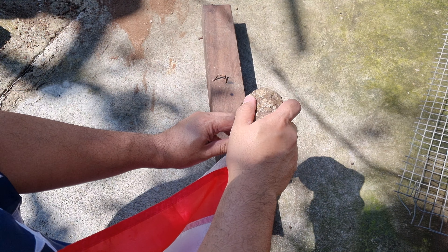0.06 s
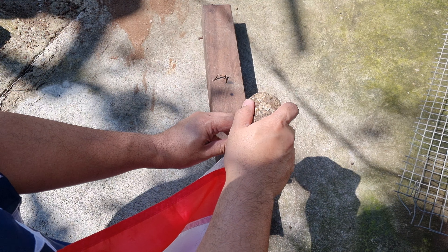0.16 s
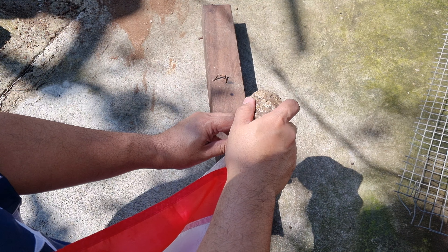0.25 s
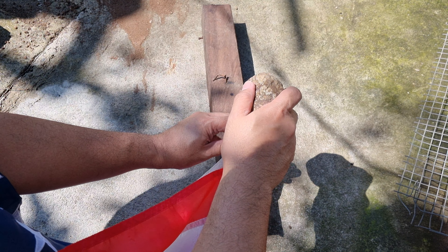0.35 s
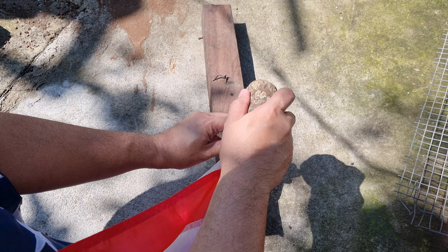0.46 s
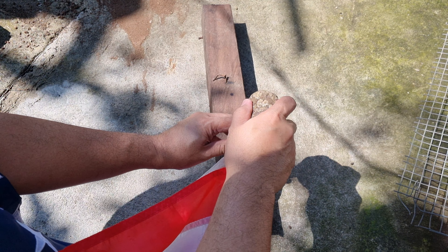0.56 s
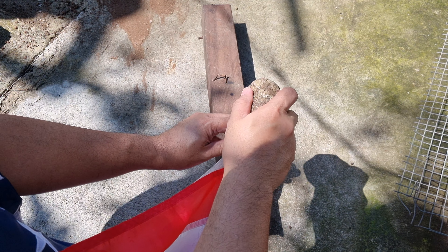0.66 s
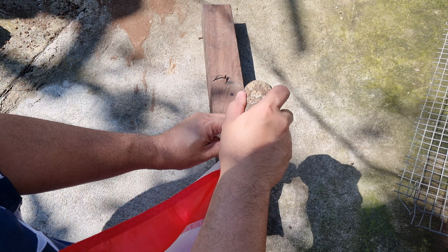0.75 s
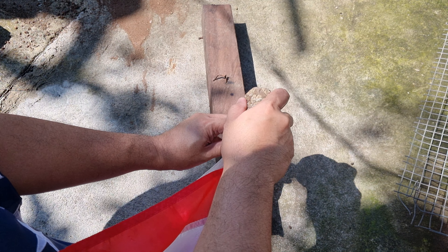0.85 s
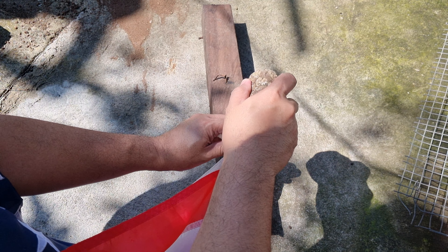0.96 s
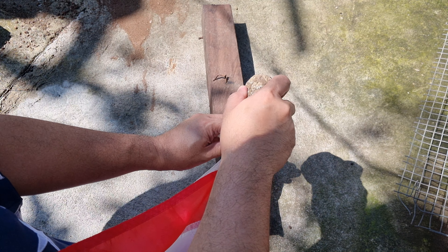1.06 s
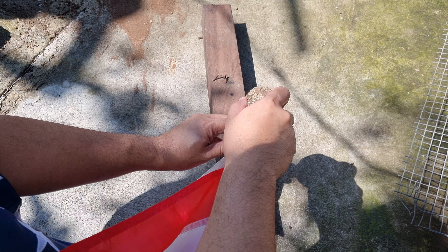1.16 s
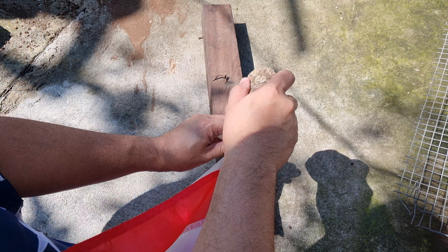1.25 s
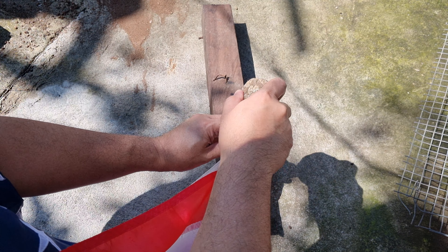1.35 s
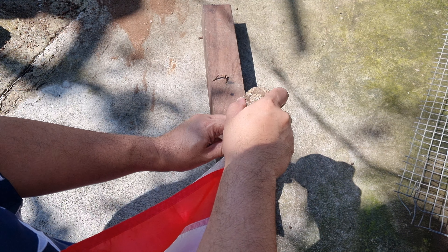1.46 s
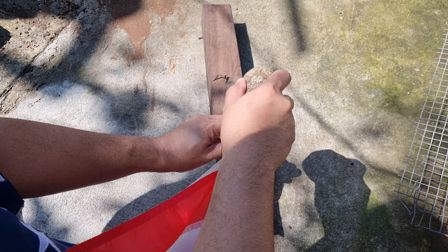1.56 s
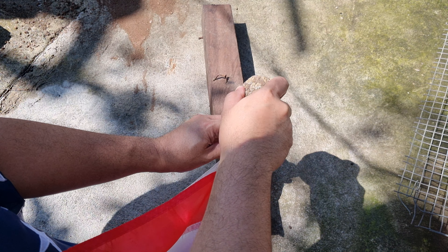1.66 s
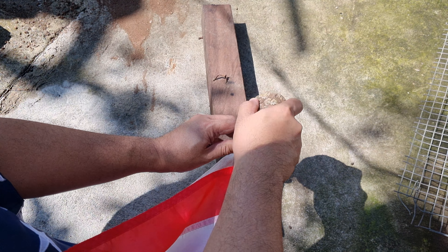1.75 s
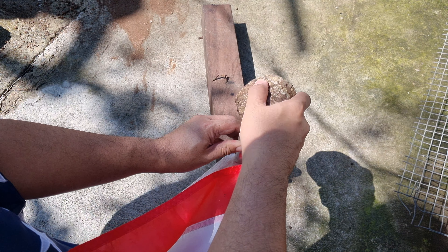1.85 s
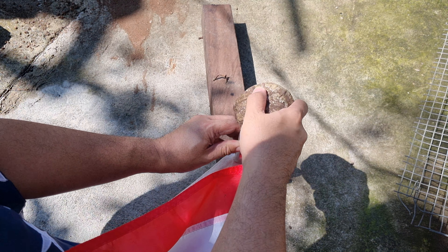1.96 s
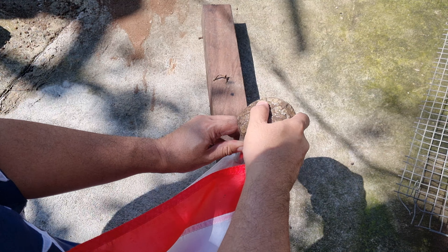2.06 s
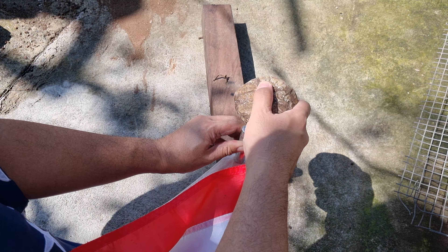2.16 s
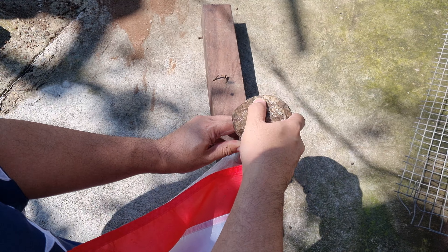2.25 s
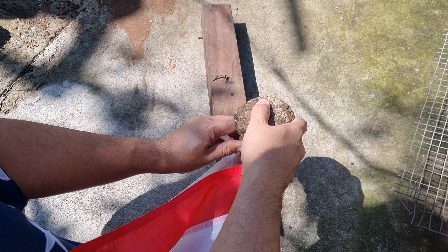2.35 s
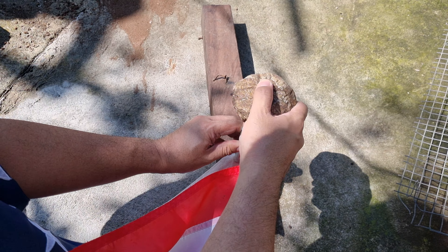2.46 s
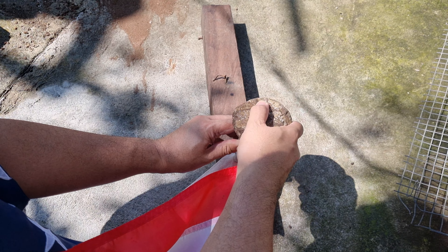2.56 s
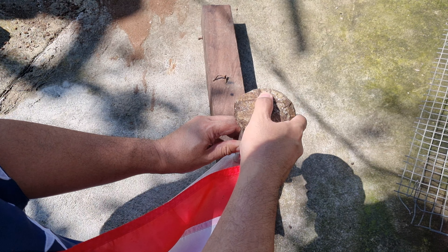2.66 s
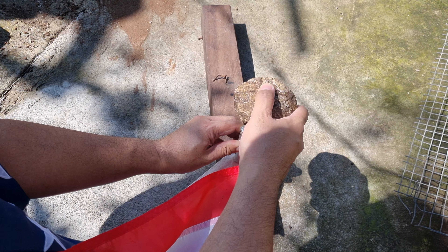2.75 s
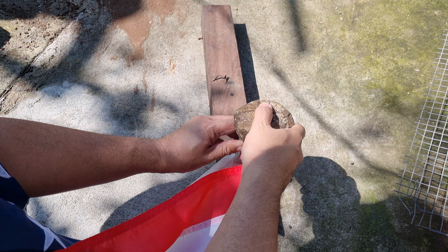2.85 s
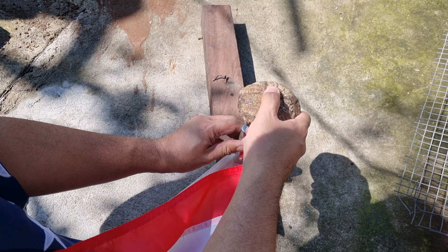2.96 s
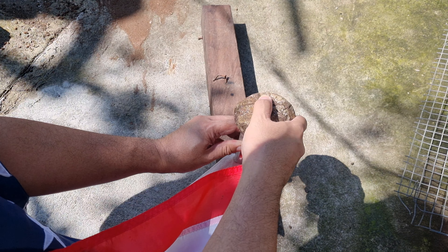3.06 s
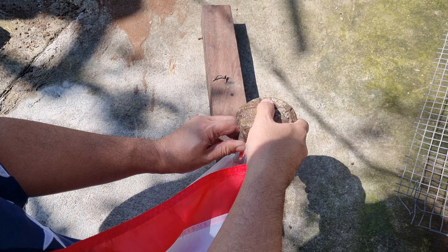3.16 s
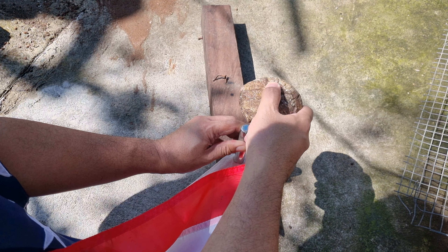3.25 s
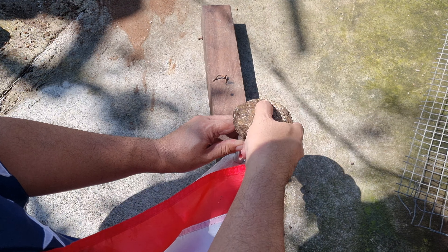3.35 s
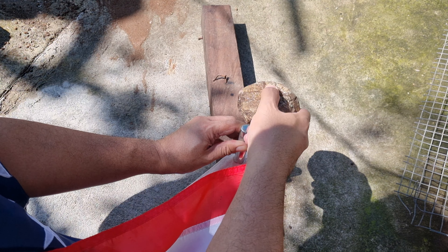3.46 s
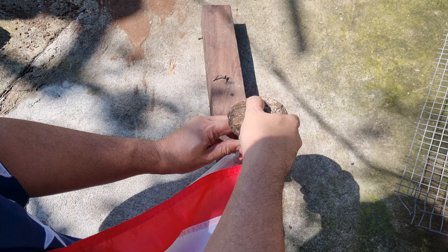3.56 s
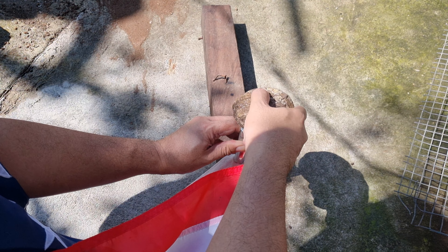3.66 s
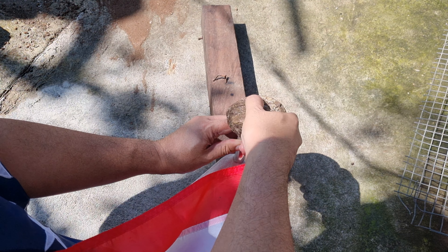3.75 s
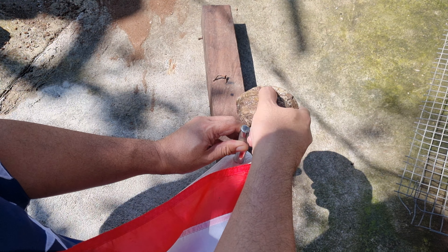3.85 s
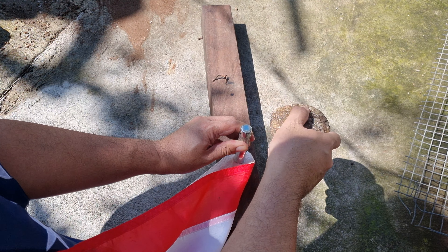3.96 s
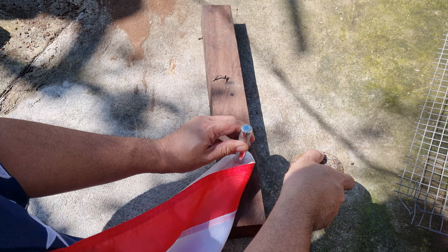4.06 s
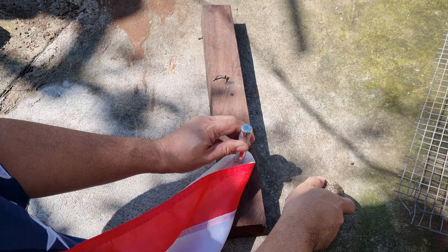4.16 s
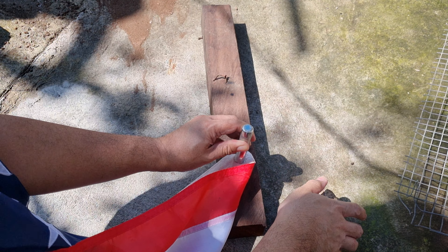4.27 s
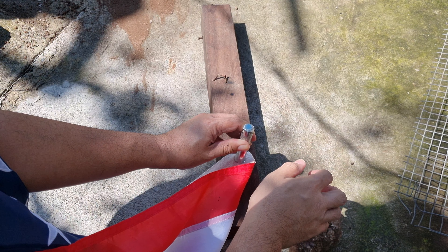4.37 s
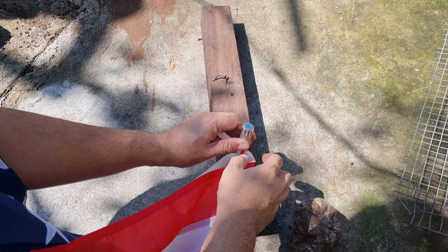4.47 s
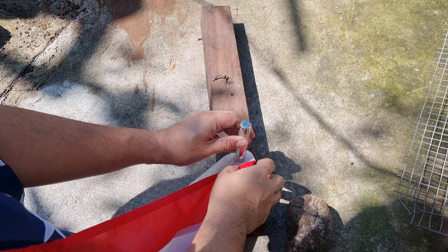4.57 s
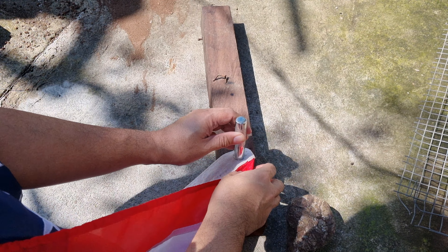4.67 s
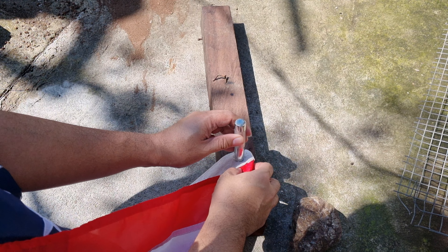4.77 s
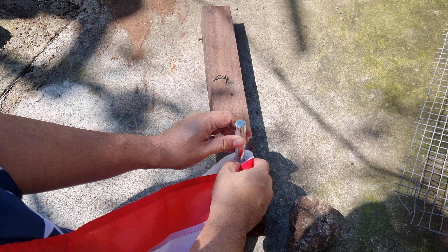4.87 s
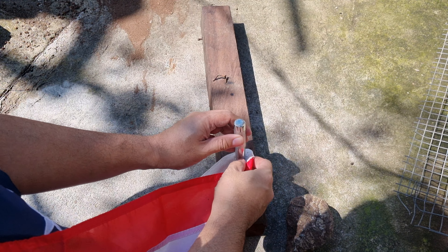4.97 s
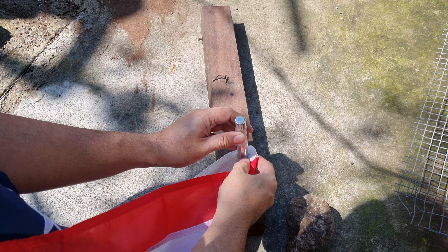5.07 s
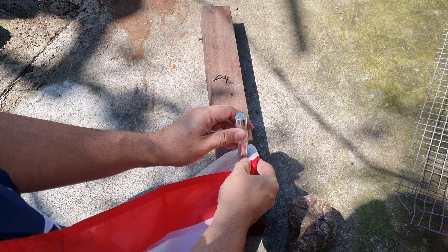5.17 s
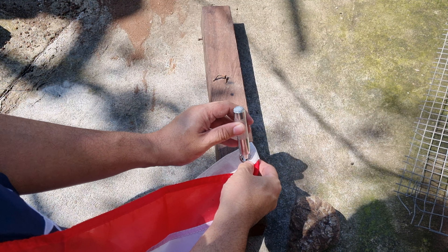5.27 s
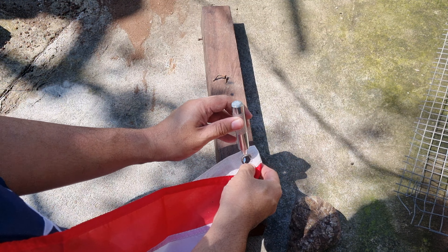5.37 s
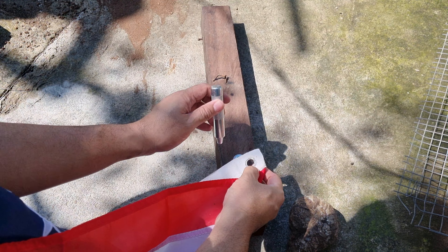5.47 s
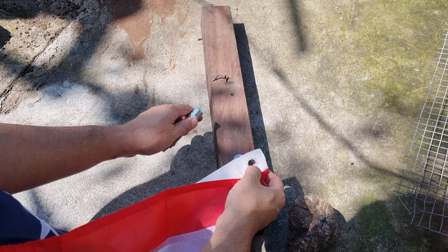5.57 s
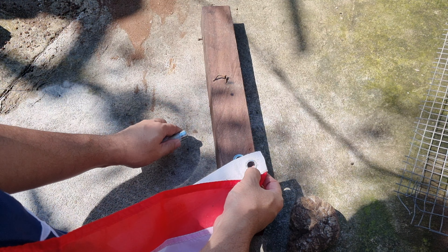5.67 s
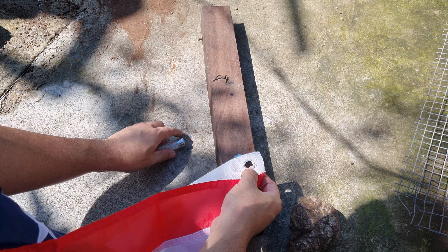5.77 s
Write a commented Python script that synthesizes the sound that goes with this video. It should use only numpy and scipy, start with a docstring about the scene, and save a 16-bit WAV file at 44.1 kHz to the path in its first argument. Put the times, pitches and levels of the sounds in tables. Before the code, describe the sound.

Rapid, sharp clinks of stone on a metal punch outdoors, followed by a dull knock, faint ticks and a thin ting.

```python
"""Outdoors on a concrete slab, a stone drives a hand-held steel punch into a grommet on a wooden board.
Each blow crushes grit with a crack, rings the punch and knocks the board; nearby walls answer briefly.
Then the stone is put down, the punch is wiggled free, the cloth shifts and the punch is laid aside.
Behind it all are a far rumble, soft air, the hum of a distant machine and a faint whine."""
import sys
import numpy as np
from scipy import signal
from scipy.fft import rfft, irfft, next_fast_len
from scipy.io import wavfile
from scipy.ndimage import uniform_filter1d

SR = 44100
rng = np.random.default_rng(int(sys.argv[2]) if len(sys.argv) > 2 else 0)


def unload_audio(sound):
    """Save the sound as a 16-bit wav file, at the path given as the first command line argument."""
    columns = np.transpose(np.atleast_2d(sound))
    # keep every value between -1 and 1, then stretch to whole-number steps
    steps = np.round(np.clip(columns, -1, 1) * 32767)
    wavfile.write(sys.argv[1], SR, steps.astype(np.int16))


N = 256566
T = np.arange(N) / SR
AGE = T[:SR // 4]   # seconds since a hit


def from_db(db):
    """Turn decibels into a number to multiply by."""
    return 10 ** (np.asarray(db) / 20)


def at_hz(points, hz, column=1):
    """Read between the rows of a table, with octaves evenly spaced."""
    table = np.array(points)
    return np.interp(np.log(np.maximum(hz, 1)), np.log(table[:, 0]), table[:, column])


def add(out, s, sound):
    """Mix a sound in, starting at s seconds."""
    start = max(round(s * SR), 0)
    out[:, start:start + sound.shape[-1]] += sound[..., :N - start]


def fade(fade_s):
    """Dying away after a hit: the fade time is how long it takes to drop 60 dB."""
    return from_db(-60 * AGE / max(fade_s, 1e-3))


def swell(rise_s):
    """Building up while one thing pushes on another."""
    return 1 - np.exp(-AGE / max(rise_s, 1e-5))


def struck(tones):
    """A struck object's fading tones, every other one flipped, a little different in each ear."""
    out, ears = 0, np.array([[.5], [-.5]])
    for k, (hz, db, fade_s, pan_db, phase) in enumerate(tones):
        wave = np.sin(2 * np.pi * hz * AGE + ears * phase)
        out += (-1) ** k * from_db(db + ears * pan_db) * wave * fade(fade_s)
    return out


# How alike the two ears hear a noise (frequency [Hz], likeness [-1 to 1])
EAR_LIKENESS = [(60, 0.89), (350, 0.77), (700, -0.0058), (1400, 0.26), (3000, 0.29), (5000, 0.19),
                (12000, 0.67)]
def noise(colour, size, likeness=EAR_LIKENESS):
    """Stereo noise of strength 1; its colour says how strong the lows and highs are."""
    length = next_fast_len(size)
    mid, side = rfft(rng.standard_normal((2, length)))
    hz = np.arange(len(mid)) * SR / length
    alike = np.clip(at_hz(likeness, hz), -1, 1)
    stereo = np.sqrt(1 + alike) * mid + np.sqrt(1 - alike) * side * [[1], [-1]]
    x = irfft(from_db(at_hz(colour, hz)) * stereo, length)
    return x[:, :size] / np.std(x)


def burst(colour, fade_s, rise_s):
    """A spray of tiny hits that blur into one short noise."""
    shape = fade(fade_s) * swell(rise_s) ** 2
    x = noise(colour, len(AGE)) * shape
    return x * np.sqrt(np.mean(shape ** 2) / np.mean(x ** 2))


# How the background rises and falls (time [s], relative rumble level [dB], air level [dB])
BACKGROUND_LEVELS = [(0.0, -38, -65), (1.8, -44, -74.5), (3.77, -49, -72), (3.87, -48, -80.5),
                     (5.54, -44, -73), (5.82, -37.5, -64.5)]
# Colours of the rumble and the air (frequency [Hz], relative level [dB])
RUMBLE_COLOUR = [(20, -59), (32, -22.5), (45, -5), (62, -4), (80, -14.5), (110, -10), (150, -1.5),
                 (200, -10.5), (260, -12), (330, -18.5), (450, -26), (600, -28.5), (900, -40), (2000, -86)]
AIR_COLOUR = [(300, -18.5), (500, -0.5), (800, 0), (1500, -0.5), (2300, -4.5), (3100, -4), (3700, -15.5),
              (4800, -22), (7000, -30.5), (16000, -31.5)]
def rumble_and_air():
    """A far, deep rumble under a soft hiss of air."""
    s, rumble_db, air_db = np.transpose(BACKGROUND_LEVELS)
    rumble = from_db(np.interp(T, s, rumble_db) - 2) * noise(RUMBLE_COLOUR, N)
    air = from_db(np.interp(T, s, air_db)) * noise(AIR_COLOUR, N)
    return rumble + air


# The tones of the hum (pitch [Hz], level [dB])
HUM_TONES = [(57, -49.5), (112, -50.5), (556, -75)]
def machine_hum(waver_rad=0.27):
    """A distant machine hums, each tone drifting a little."""
    out = np.zeros(N)
    times = np.linspace(0, T[-1], 40)
    for hz, db in HUM_TONES:
        drift = np.interp(T, times, np.cumsum(rng.normal(0, waver_rad, len(times))))
        out += from_db(db) * np.sqrt(2) * np.sin(2 * np.pi * hz * T + drift)
    return out


# The tones of the whine (pitch [times the main pitch], relative level [dB])
WHINE_TONES = [(.71, -6), (1, 0), (2, -10)]
def whine(start_hz=1690, sink_hz_per_s=190, start_db=-70, fade_db_per_s=13):
    """A faint, unsteady whine that sinks and fades."""
    waver = 1 + 0.16 * uniform_filter1d(rng.standard_normal(N), size=600)
    cycles = np.cumsum((start_hz - sink_hz_per_s * T) * waver) / SR
    tones = sum(from_db(db) * np.sin(2 * np.pi * k * cycles) for k, db in WHINE_TONES)
    return from_db(start_db - fade_db_per_s * T) * tones


# Echoes off the ground and walls (delay [s], relative level [dB])
WALL_ECHOES = [(.0058, -30), (.009, -25), (0.0132, -14), (0.033, -25), (0.049, -36)]
# The tail of blurred echoes (frequency [Hz], relative level [dB], fade time [s])
TAIL_BANDS = [(118.7, -12, 0.28), (288, 1.5, 0.048), (590, -8, 0.12), (1200, -20, 0.15), (1730, -18, 0.17),
              (2300, -15.5, 0.13), (3040, -6, 0.18), (5040, -8.5, 0.15), (9600, -3.5, 0.13),
              (14000, -3, 0.11)]
# How alike the two ears hear that tail (frequency [Hz], likeness [-1 to 1])
TAIL_LIKENESS = [(100, .98), (380, .95), (700, .2), (1500, .6), (2000, .7), (3200, .1), (12000, -.2)]
def yard_echoes(sound, dull_above_hz=2000, tail_delay_s=0.0019):
    """The yard throws a sound back: a few dull echoes and a short tail that dies band by band."""
    echoes = np.zeros((2, len(AGE)))
    for delay, db in WALL_ECHOES:
        echoes[:, round(delay * SR)] = from_db(db)
    echoes = signal.sosfilt(signal.butter(1, dull_above_hz, fs=SR, output="sos"), echoes + 1e-18)
    scatter = rfft(noise([(20, 0), (20000, 0)], len(AGE), TAIL_LIKENESS))
    hz = np.arange(scatter.shape[1]) * SR / len(AGE)
    arrival = np.interp(AGE - tail_delay_s, AGE, swell(rise_s=0.00088))
    edges_hz = np.geomspace(70, 17000, 36)
    for low, high in zip(edges_hz, edges_hz[1:]):
        centre = np.sqrt(low * high)
        band = irfft(scatter * ((hz >= low) & (hz < high)), len(AGE))
        band *= arrival * fade(at_hz(TAIL_BANDS, centre, column=2))
        band /= np.linalg.norm(band, axis=1, keepdims=True)
        share = (high - low) / (SR / 2)   # a wider band carries more energy
        echoes += from_db(at_hz(TAIL_BANDS, centre)) * np.sqrt(share) * band
    return signal.oaconvolve(sound, echoes, axes=1)[:, :N]


# Colour of rubbing and of loose grit (frequency [Hz], relative level [dB])
SCRATCH_COLOUR = [(2000, 9.5), (4000, -1.5), (6500, 3.5), (8000, -1), (9500, -1), (12000, -8.5),
                  (16000, -11.5)]
# Short slides of stone, cloth or steel (time [s], level [dB], half length [s])
SLIDES = [(4.328, -56, 0.0025), (4.35, -77, 0.017), (5.222, -62.5, 0.0098), (5.553, -64, 0.013),
          (5.801, -62, 0.01)]
def rubbing(start_s=4.3, rub_db=-89):
    """Hand and cloth rub as the punch is worked loose, with a few louder slides."""
    level = from_db(rub_db) * (T > start_s)
    level += sum(from_db(db) * np.exp(-((T - s) / length) ** 2) for s, db, length in SLIDES)
    times = T[::150]
    catch_db = 2.9 * np.interp(T, times, rng.standard_normal(len(times)))   # fibres catch and slip
    return level * from_db(catch_db) * noise(SCRATCH_COLOUR, N)


# Stone, hand and tool landing on the slab (time [s], relative level [dB])
SLAB_KNOCKS = [(4.215, -25), (4.243, -46), (4.324, -32), (4.349, -41), (4.561, -48), (4.653, -50.5),
               (4.67, -44), (4.815, -44.5), (4.88, -49.5), (5.798, -33.5), (5.806, -32.5)]
# Colours of a rap on the slab and of its low thud (frequency [Hz], relative level [dB])
RAP_COLOUR = [(30, -37.5), (120, -5), (280, 7), (650, -1.5), (1300, -3), (2200, -16.5), (3300, -29.5),
              (4500, -62.5), (16000, -67.5)]
LOW_THUD_COLOUR = [(60, -9), (150, 4), (300, -3), (650, -7), (1300, -25.5), (3000, -71)]
def slab_knocks():
    """Each thing set down on concrete makes a dull rap, a thud and a trace of grit."""
    out = np.zeros((2, N))
    for s, db in SLAB_KNOCKS:
        add(out, s, from_db(db + 3.5) * burst(RAP_COLOUR, fade_s=0.02, rise_s=0.00026))
        add(out, s, from_db(db - 7) * burst(LOW_THUD_COLOUR, fade_s=0.093, rise_s=0.00088))
        add(out, s, from_db(db - 34) * burst(SCRATCH_COLOUR, fade_s=0.027, rise_s=0.00092))
    return out


# The punch is laid aside (time [s], level [dB], pitch [Hz], fade time [s])
TIP_TOUCHES = [(5.800, -42, 9670, 0.42)]
def tip_ting():
    """The steel tip touches the concrete and gives one thin, high tone."""
    out = np.zeros((2, N))
    for s, db, hz, fade_s in TIP_TOUCHES:
        add(out, s, from_db(db) * np.sin(2 * np.pi * hz * AGE) * fade(fade_s) * swell(rise_s=0.00086))
    return out


# Overtones of punch and stone, the tones above the main ring
# (pitch [Hz], relative level [dB], fade time [s], left over right [dB], left-right phase [rad])
PUNCH_OVERTONES = [(2108, 16.5, 0.0099, 1, 0.35), (2100, -8, 0.04, -6, .2), (2580, -6.5, 0.021, 3.5, 1),
                   (2976, 4, 0.01, 5, 0.21), (3062, -3.5, 0.028, 3, 0.032), (3150, -27, 0.077, -6.5, 0.98),
                   (3147, -21, 0.16, 6.5, .8), (3320, -17.5, 0.032, -1, .6)]
# The punch rocks in the grommet (time [s], relative level [dB])
WIGGLES = [(4.4224, -51.5), (4.649, -50.5), (4.7446, -56), (4.7561, -47.5), (4.988, -33), (5.1171, -51.5),
           (5.1478, -56)]
def punch_ticks(ring_hz=1875):
    """Wiggling the punch makes it tick: such soft touches wake only its lower tones."""
    out = np.zeros((2, N))
    ring = np.sin(2 * np.pi * ring_hz * AGE) * fade(0.051)
    tick = (ring + from_db(-13.5) * struck(PUNCH_OVERTONES)) * swell(rise_s=0.00069) ** 2
    for s, db in WIGGLES:
        add(out, s, from_db(db + 2) * tick)
    return out


# The punch's highest overtones
# (pitch [Hz], relative level [dB], fade time [s], left over right [dB], left-right phase [rad])
CLANK_TONES = [(4274, -1, .065, -3, 0.51), (4423, 5.5, 0.13, -2.5, -0.82), (4570, -3.5, .08, 0.5, 0),
               (4751, -2.5, 0.12, -2, .5), (5630, -5.5, .07, 0, 1)]
def punch_ring(force, treble, skew, give, ring_hz=1866, grip_hz=16, choke_db_per_s=1700):
    """Struck steel rings briefly in the hand; an off-centre blow (skew) mutes it."""
    hz = ring_hz + rng.uniform(-grip_hz, grip_hz)   # the grip shifts the pitch
    ring = from_db(-1 - 13 * skew) * np.sin(2 * np.pi * hz * AGE) * swell(rise_s=.001) * fade(0.04)
    overtones = from_db(-18.5 - 3.5 * skew + 2 * give) * struck(PUNCH_OVERTONES) * swell(rise_s=.0001)
    clank = from_db(-40.5 - 4 * give) * struck(CLANK_TONES) * swell(rise_s=.00017)
    choke = from_db(-choke_db_per_s * skew ** 2 * AGE)
    return (force * (overtones - ring) + treble * clank) * choke


# The tones of the wooden board
# (pitch [Hz], relative level [dB], fade time [s], left over right [dB], left-right phase [rad])
BOARD_TONES = [(245, -12.5, 0.022, -1, -0.15), (300, -13, 0.031, 0, .1), (418, -12, 0.046, 1, .2),
               (566, -7.5, .025, 0.5, .5), (750, -7, 0.029, 1, 2.2), (850, -9.5, 0.0069, 1, 0.39),
               (1238.6, 0, 0.0027, -0.5, -0.65), (1372, 5.5, .007, -0.5, -0.24)]
def board_knock():
    """The board gives a wooden knock and chatters on the slab."""
    knock = from_db(-14.5) * struck(BOARD_TONES) * swell(rise_s=.0001) ** 2
    chatter = from_db(-26) * burst(RAP_COLOUR, fade_s=0.097, rise_s=0.0013)
    return knock + chatter


# The stone's dead clack on the punch, and the low thump under the board
# (pitch [Hz], relative level [dB], fade time [s], left over right [dB], left-right phase [rad])
CLACK_TONES = [(775, -1.5, 0.0082, 1, .3), (1228, 4, 0.0094, 4, 0.11), (2084, 0.5, 0.025, -2, 0.021)]
THUMP_TONES = [(132.8, 9, .12, 1.5, 0.0059), (190, -3.5, 0.17, -1, 0.0031), (265, 6, 0.085, 1, 0),
               (302, 1.5, 0.042, -0.5, 0.0013)]
# Colour of grit being crushed (frequency [Hz], relative level [dB])
CRACK_COLOUR = [(300, -10.5), (700, -11.5), (1500, -4.5), (2700, 4.5), (3700, 1.5), (5500, -4),
                (7800, -20.5), (9900, -11), (12500, -24), (16000, -35.5)]
# The stone's blows (time [s], force [dB], off-centre [0-1], hardness [dB], flying grit [dB])
STONE_BLOWS = [(0.147, -14.5, 0.25, -2, -63), (0.4903, 0.5, 0.07, 3, -34), (0.7904, 0.5, 0.12, 3.5, -35),
               (1.0938, -1.5, 0.03, 3.5, -42), (1.3814, 0, 1, -11, -66), (1.6839, 0.5, 0.36, 0, -46.5),
               (1.9842, 1, 0.16, -1, -44), (2.2609, 0.5, 0.08, -0.5, -45.5), (2.5347, 1, 0.18, 0.5, -44.5),
               (2.7966, 1.27, 0.08, -0.5, -46.5), (3.0702, 0.5, 0.18, 1, -47.5), (3.3165, 0, 0.1, -1, -45),
               (3.556, -0.47, 0.06, 1, -38), (3.7389, -0.15, 0.21, -0.5, -42)]
def hammering(closed_at_s=2.05, thump_delay_s=.007):
    """The stone meets the punch; a moment later the punch lands on the grommet and drives the board.
    As the grommet closes, the punch lands sooner, with less thump and more clank."""
    out = np.zeros((2, N))
    clack = struck(CLACK_TONES) * swell(rise_s=.0002)
    thump = struck(THUMP_TONES) * swell(rise_s=.0028)
    for s, force_db, skew, hard_db, grit_db in STONE_BLOWS:
        gap = max(1 - s / closed_at_s, 0)   # the grommet: 1 is open, 0 is shut
        give = np.tanh(gap / .12)   # it keeps yielding until almost shut
        travel_s = .0007 + .0028 * gap ** 2
        force = from_db(force_db)
        treble = from_db(2 * force_db + hard_db)   # stronger blows sound brighter
        shove = force * from_db(5.5 * skew)   # off-centre blows push the board more
        steel = punch_ring(force, treble, skew, give)
        crack = treble * from_db(-16) * burst(CRACK_COLOUR, fade_s=.013, rise_s=.0002)
        grit = from_db(grit_db) * burst(SCRATCH_COLOUR, fade_s=.06, rise_s=.0004)
        wood = shove * board_knock()
        first_clack = force * from_db(-18.5 + 8 * gap) * clack   # a loose punch clacks louder
        first_crunch = treble * from_db(-30.5) * burst(CRACK_COLOUR, fade_s=.008, rise_s=.00005)
        add(out, s, first_clack + first_crunch)
        add(out, s + travel_s, steel + crack + grit + wood)
        add(out, s + thump_delay_s, shove * from_db(-36.5 + 8.5 * give) * thump)
    return out


def scene():
    """The work close by, its echoes and the background."""
    work = hammering() + slab_knocks() + punch_ticks() + tip_ting() + rubbing()
    return work + yard_echoes(work) + rumble_and_air() + machine_hum() + whine()


def record(dry, cutoff_hz=17000):
    """Round off the loudest peaks and cut the very highest treble."""
    rounded = dry / (1 + dry ** 6) ** (1 / 6)
    return signal.sosfilt(signal.cheby2(12, 70, cutoff_hz, fs=SR, output="sos"), rounded)


dry = scene()
out = record(dry)
unload_audio(out)
```